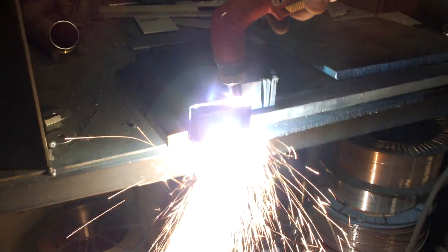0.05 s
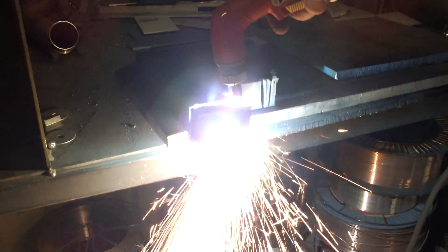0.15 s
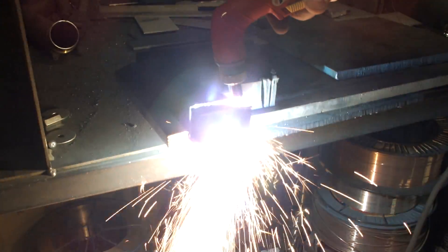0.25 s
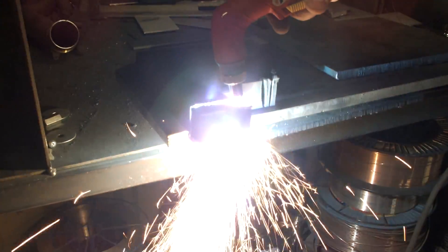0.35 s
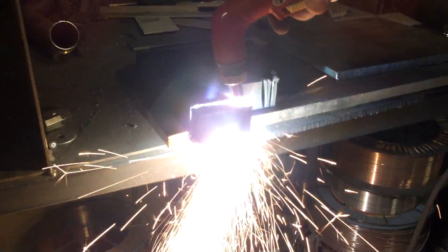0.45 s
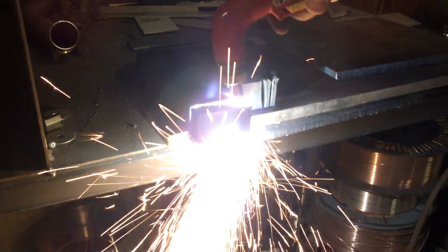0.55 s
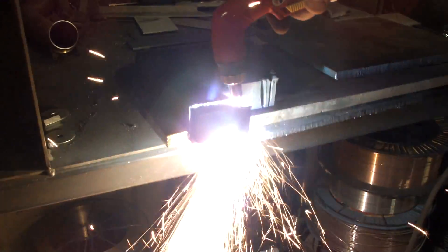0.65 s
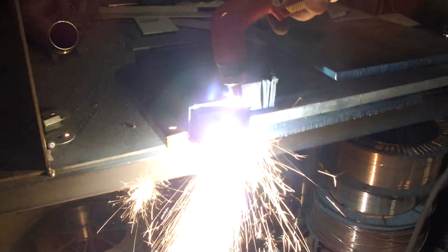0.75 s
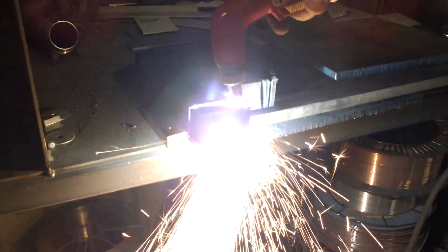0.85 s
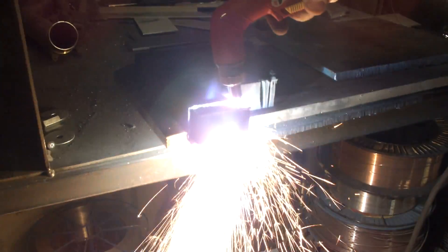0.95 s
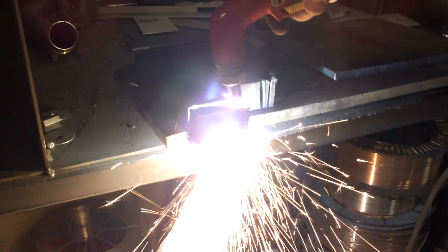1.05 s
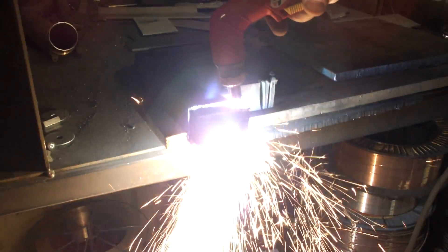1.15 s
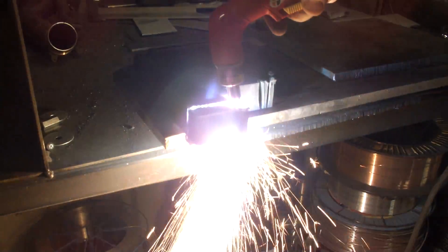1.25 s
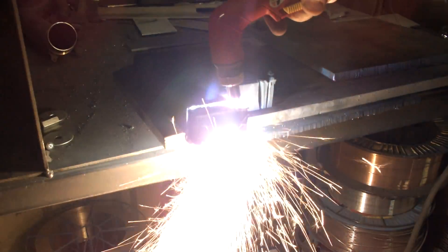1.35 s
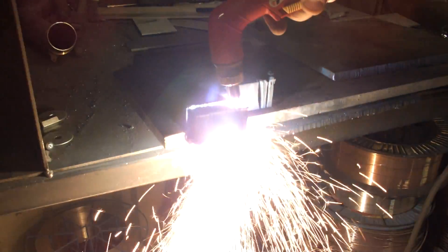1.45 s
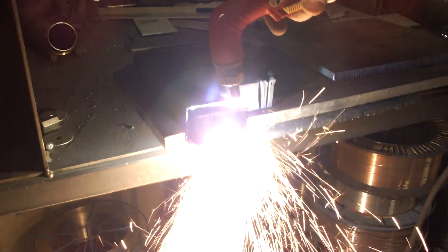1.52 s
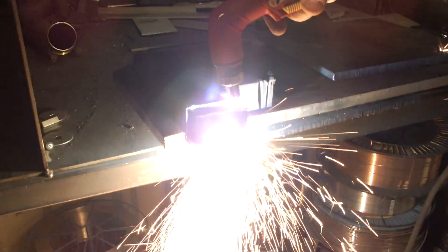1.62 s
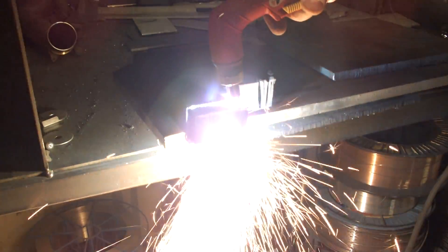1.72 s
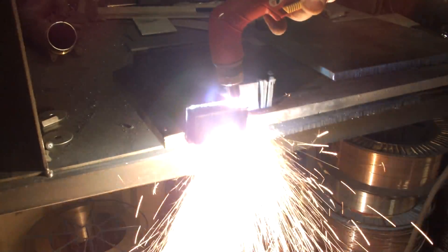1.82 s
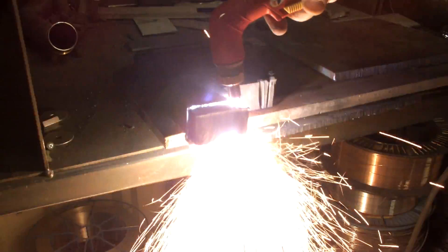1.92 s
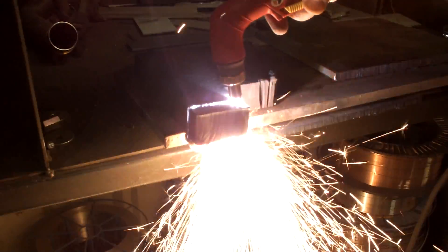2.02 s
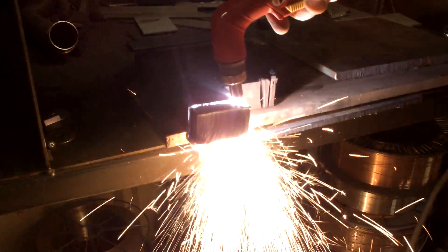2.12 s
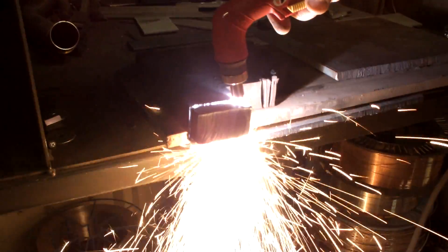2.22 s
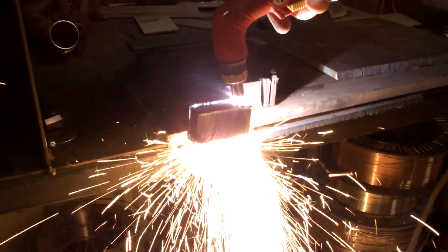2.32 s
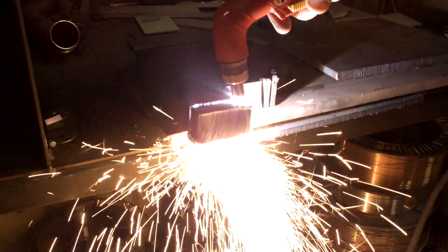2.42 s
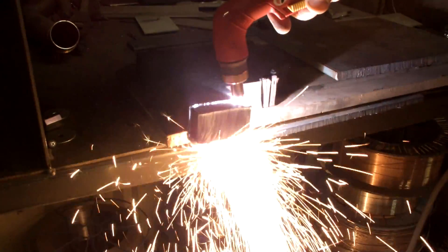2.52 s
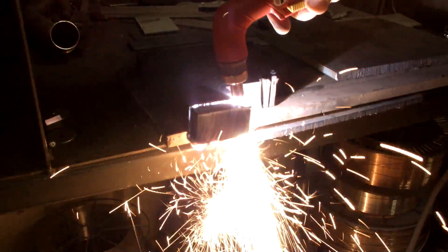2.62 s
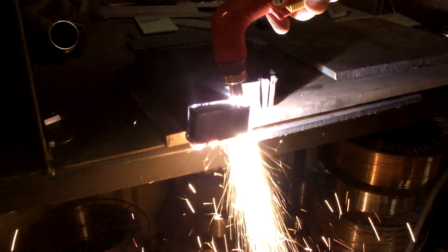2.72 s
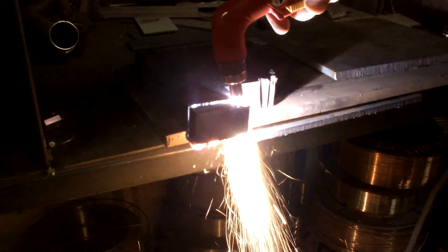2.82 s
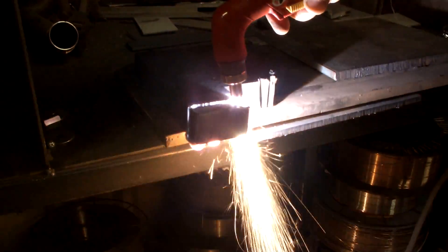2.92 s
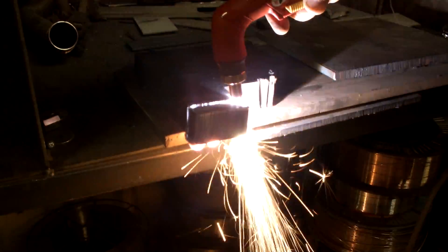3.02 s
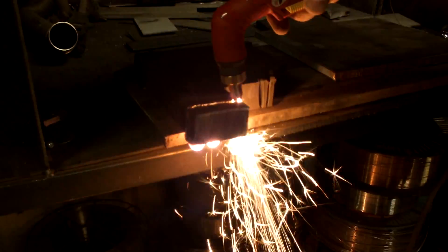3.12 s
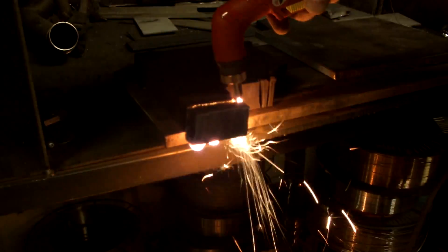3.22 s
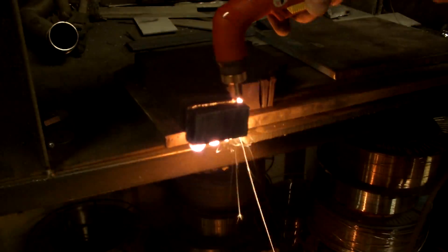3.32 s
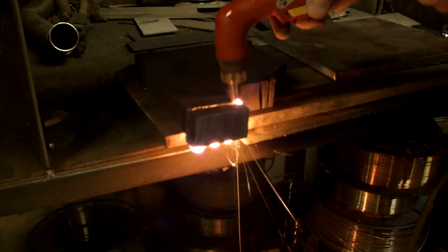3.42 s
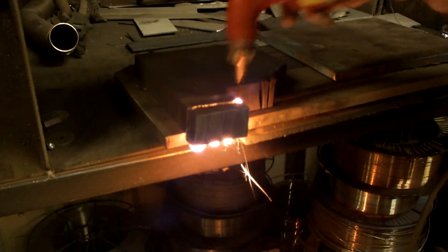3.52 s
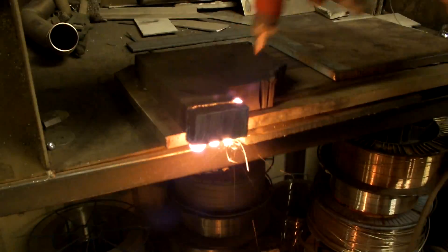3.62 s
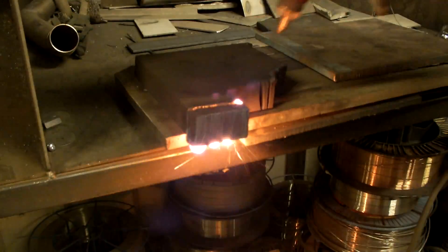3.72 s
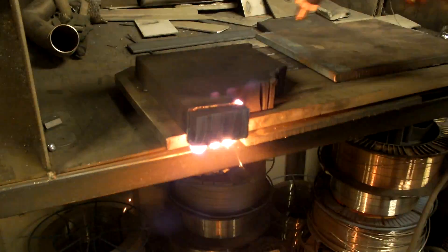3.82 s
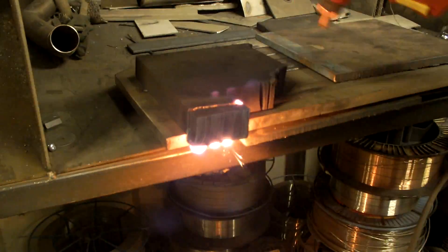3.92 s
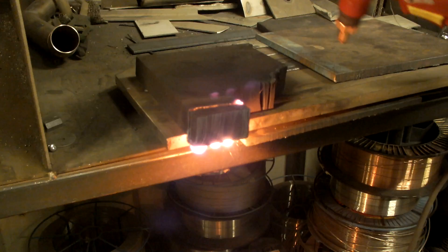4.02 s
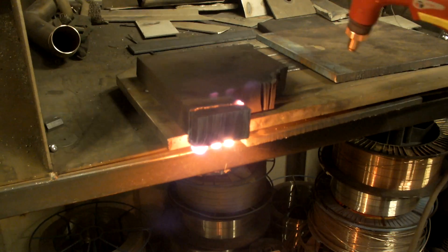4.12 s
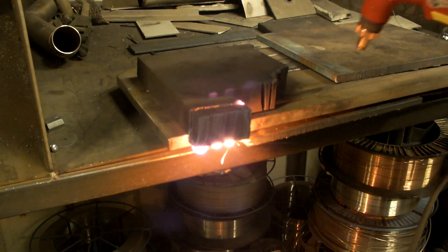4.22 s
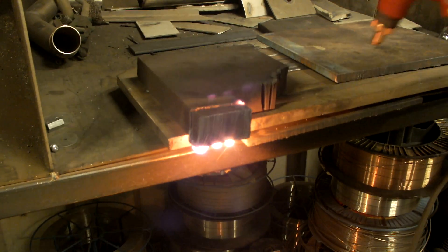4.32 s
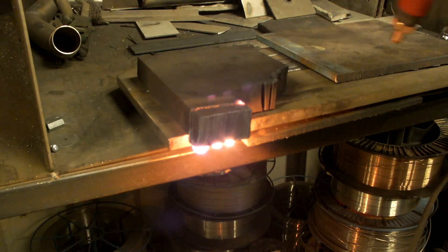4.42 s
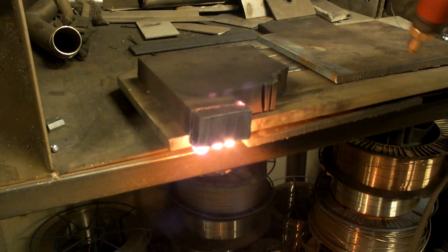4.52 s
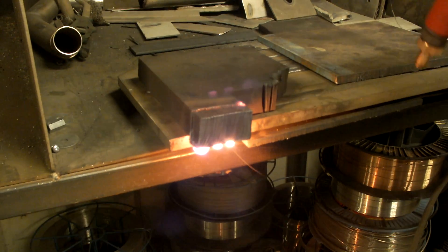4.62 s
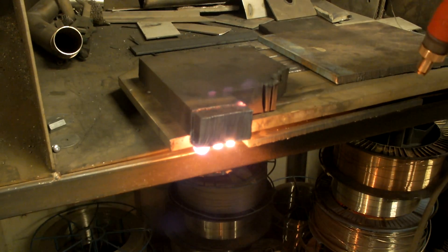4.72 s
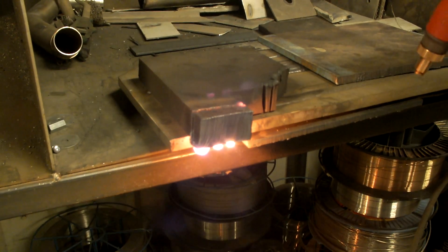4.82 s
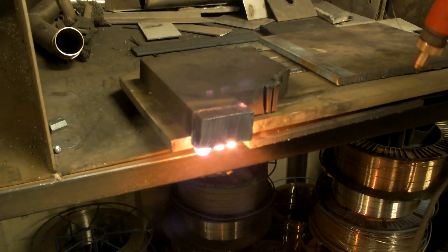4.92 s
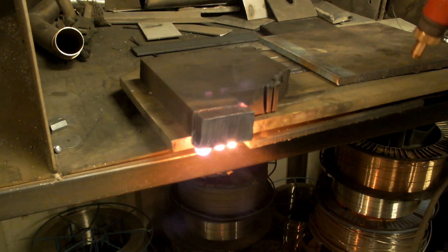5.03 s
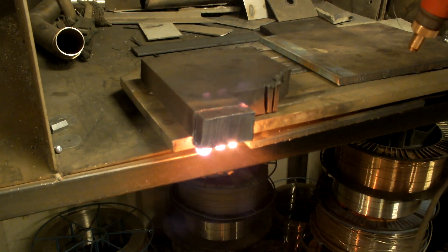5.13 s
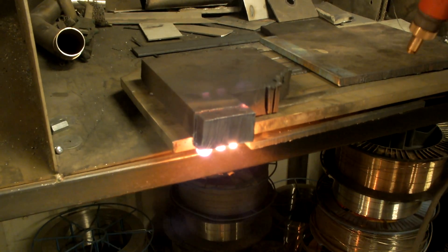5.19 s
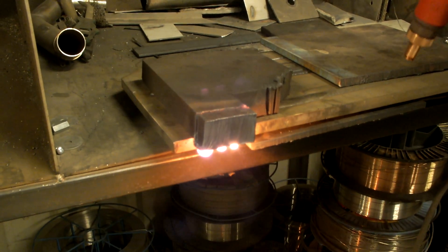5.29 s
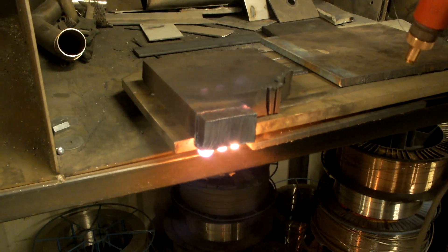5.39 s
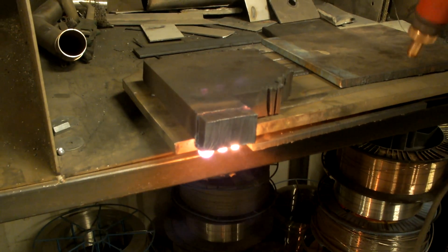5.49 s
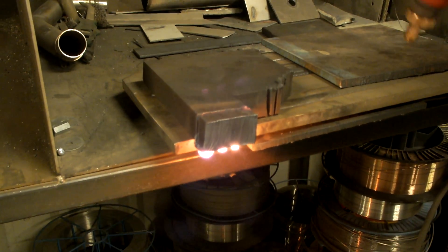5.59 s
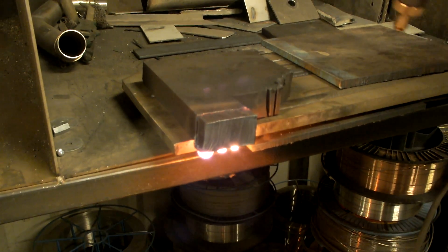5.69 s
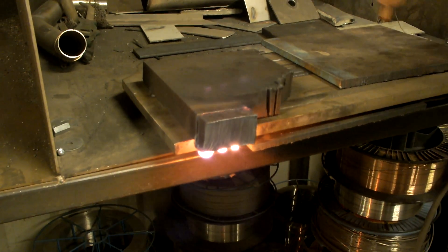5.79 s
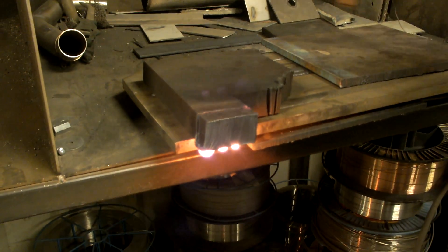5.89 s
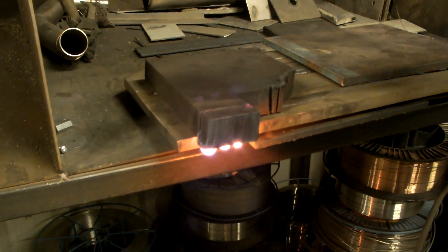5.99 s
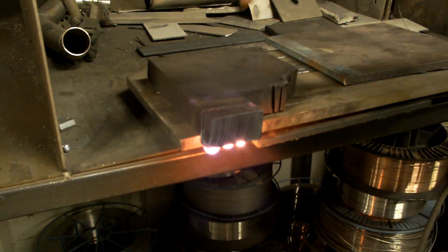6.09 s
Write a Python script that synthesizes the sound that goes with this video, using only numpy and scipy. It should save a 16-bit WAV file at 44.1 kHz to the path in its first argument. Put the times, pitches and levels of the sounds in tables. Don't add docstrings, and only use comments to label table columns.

```python
import sys
import numpy as np
from scipy import signal
from scipy.fft import rfft, irfft, next_fast_len
from scipy.io import wavfile
from scipy.ndimage import uniform_filter1d

SR = 44100
rng = np.random.default_rng(int(sys.argv[2]) if len(sys.argv) > 2 else 0)


def voltage_ratio(level):
    return 10 ** (np.asarray(level, float) / 20)


def unload_wav(signal):
    wavfile.write(
        sys.argv[1],
        SR,
        np.round(np.clip(np.atleast_2d(signal).T, -1, 1) * 32767).astype(np.int16),
    )


N = 271215
T = np.arange(N) / SR
SIZE = next_fast_len(int(3.3 * SR))
HZ = np.maximum(np.arange(SIZE // 2 + 1) * SR / SIZE, 1)

# low_hz, high_hz
JET_BANDS = [
    (40, 150),
    (150, 900),
    (1500, 3200),
    (3800, 7000),
    (7600, 8800),
    (9000, 15000),
]
# pitch_hz, level_db (per Hz)
BURIED_COLOUR = [(18, -60), (30, -33), (471, -14.5), (955, -14), (1940, -8.5), (2150, -8.5), (3640, -5),
                 (4150, -7), (5680, -3), (6050, -3.5), (6450, -5), (7390, -5), (8870, -6), (9600, -8),
                 (11500, -9), (14200, -12), (15800, -18)]
FREE_COLOUR = [(18, -59), (30, -26), (114, -23), (198, -9), (238, -15.5), (775, -11.5), (860, -9.5),
               (2150, -4), (2460, -3.5), (2800, -1.5), (3900, -0.5), (5990, 1), (7200, -4.5), (8420, -0.5),
               (9860, -10), (11500, -7.5), (14200, -12), (15800, -21)]
# pitch_hz, width_hz, boost_db
BURIED_RINGING = [(2218, 143, 2.4), (2433, 124, 1.9), (3295, 152, 2.0), (3682, 96, 1.6), (4393, 131, 2.7),
                  (4565, 61, 3.3), (4867, 76, 2.2), (5082, 102, 3.1), (5463, 86, 2.6), (5765, 90, 2.8),
                  (5986, 104, 3.0), (6761, 55, 1.8), (6977, 70, 2.8), (7838, 88, 2.6), (7967, 83, 3.4),
                  (8247, 63, 1.6), (9022, 60, 2.1), (9238, 73, 2.9), (9604, 51, 1.9), (9733, 180, 1.9),
                  (10379, 158, 2.2), (10530, 136, 1.9), (11434, 90, 2.3), (12468, 110, 1.9)]
FREE_RINGING = [(1507, 135, 1.6), (1744, 64, 3.1), (2261, 117, 3.3), (2445, 150, 5.6), (2993, 78, .6),
                (3316, 113, 2.8), (3510, 53, 1.5), (4264, 210, 1.6), (4673, 151, 1.5), (5082, 95, 3.5),
                (5771, 97, 2.0), (6202, 103, 3.6), (6848, 115, 3.3), (7214, 106, 2.3), (7817, 77, 2.8),
                (7989, 136, 1.9), (8204, 71, 3.5), (9022, 60, 1.7), (9216, 92, 2.1), (10121, 198, 2.2),
                (10702, 86, 2.1), (11003, 87, 2.2), (12618, 87, 2.3), (12855, 136, 2.8)]
# pitch_hz, width_hz, boost_db
OFFCUT_GAP = [(2160, 420, 2.5)]
# pitch_hz, level_db
BURIED_SIDE = [(60, -2), (110, -2), (200, -1), (380, -2), (700, -2), (1290, -3), (2380, -7.5), (4400, -6.5),
               (8120, -4.5), (15000, -4.5)]
BURIED_LEFT = [(60, 6), (110, 2.5), (200, 6.5), (380, 6), (700, 5.5), (1290, 7), (2380, -2.5), (4400, -1),
               (8120, 2.5), (15000, 2.5)]
# pitch_hz, level_db
FREE_SIDE = [(60, -2), (110, -3), (200, -10), (380, -3), (700, -5), (1290, -8), (2380, -8.5), (4400, -4.5),
             (8120, -4.5), (15000, -2)]
FREE_LEFT = [(60, -0.5), (110, -1), (200, 2.5), (380, 0.5), (700, 3), (1290, 4), (2380, 0), (4400, 0.5),
             (8120, 2.5), (15000, -2)]
# time_s, level_db
JET_PUSH = [
    (0, 1),
    (.5, 0.5),
    (1.3, 0.36),
    (1.47, 0),
    (1.85, 0),
    (2.18, -4.5),
    (2.48, -4.5),
    (2.72, -1),
    (3.06, -1.5),
]
# level_db inside the cut, change_db past the edge, push_share (ratio)
JET_LEVELS = [
    (-57, 2.5, 2),
    (-42.5, 2.5, 1.38),
    (-30.5, 3, -0.081),
    (-22, -0.3, 1.12),
    (-27, 3, 1.26),
    (-21, -0.8, 0.37),
]
# time_s, length_s, level_db (of the rumble)
SLAG = [(.1, 0.12, 1), (.39, 0.054, 4.5), (.6, 0.034, 3.5), (.8, 0.11, 3.5), (1.12, 0.059, -2),
        (1.26, 0.071, 5.5), (1.57, 0.045, -3), (1.72, 0.062, 1.5), (2.02, 0.044, 3), (2.27, 0.036, 3),
        (2.62, .08, 3), (2.9, 0.049, 0.5), (3.05, .04, 4)]
SLAG_SHARES = [0.6, 1.13, 0.3, 0.046, 0.01, 0.2]
# time_s, length_s, level_db
LEAN = [
    (1.3, 0.15, -0.5),
    (2.0, .06, 1),
    (2.25, .12, 1.5),
    (2.7, .08, 1),
    (2.9, .05, -0.5),
    (3.04, .04, 2.5),
]
LEAN_SHARES = [.2, 0.024, -0.39, 0.82, 0.13, -0.27]
ARC_OFF_S = 3.064
RIPPLE_HZ = 99.9


def arc():
    breakout_s, breakout_length_s = 2.08, 0.092
    out = np.clip((T - breakout_s) / breakout_length_s + .5, 0, 1)
    push, slag, lean = curve(JET_PUSH), bumps(SLAG), bumps(LEAN)
    levels = [db + edge_db * out + share * push + spit * slag + turn * lean
              for (db, edge_db, share), spit, turn in zip(JET_LEVELS, SLAG_SHARES, LEAN_SHARES)]
    ripple = 1 + .012 * np.sin(2 * np.pi * RIPPLE_HZ * T)
    buried = voltage_ratio(on_log(BURIED_COLOUR, HZ)) * resonances(BURIED_RINGING, 1.25)
    free = voltage_ratio(on_log(FREE_COLOUR, HZ)) * resonances(FREE_RINGING, 1.35) * resonances(OFFCUT_GAP, 1)
    inside = turbulence(buried, JET_BANDS, levels, BURIED_SIDE, BURIED_LEFT, 0.36, 0.87, ripple)
    outside = turbulence(free, JET_BANDS, levels, FREE_SIDE, FREE_LEFT, 0.43, 0.69, ripple, start=1.49)
    jet = np.sqrt(1 - out) * inside + np.sqrt(out) * outside

    arc_t60, shop_t60, shop_db = 0.073, 0.52, -15.5
    after = np.maximum(T - ARC_OFF_S, 0)
    dying = voltage_ratio(-60 * after / arc_t60)
    shop_tail = voltage_ratio(shop_db - 60 * after / shop_t60)
    return jet * np.maximum(dying, shop_tail)


# time_s, level_db
WHINE = [(0, -28.5), (.3, -26), (.89, -28), (.99, -31), (1.2, -31.5), (1.31, -29), (1.38, -24.5),
         (1.75, -25.5), (2.09, -28.5), (2.2, -30.5), (2.27, -35), (2.36, -31), (2.47, -38), (2.55, -45)]


def whine():
    pitch_hz, ripple_rad, ripple_depth = 8633.5, .4, .26
    s, db = np.transpose(WHINE)
    ripple = np.sin(2 * np.pi * RIPPLE_HZ * T)
    phase = 2 * np.pi * pitch_hz * T + .15 * walk(20) + ripple_rad * ripple
    tone = np.sqrt(2) * np.sin(phase) * (1 + ripple_depth * ripple)
    level = voltage_ratio(np.interp(T, s, db) + 1.1 * walk(25))
    fade = np.clip((s[-1] + .1 - T) / .1, 0, 1)
    return tone * level * fade * voltage_ratio([[1.2], [-1.2]])


# pitch_hz, level_db (per Hz)
AIR_COLOUR = [(18, -44), (30, -28), (103, -11.5), (165, -17), (210, -4), (270, -11.5), (420, -13),
              (750, -13), (1800, -10.5), (2150, -10.5), (2950, -6.5), (13200, -12.5), (15800, -13)]
# pitch_hz, width_hz, boost_db
NOZZLE = [(2170, 140, 7), (2200, 60, 5), (2430, 59, 11), (2530, 56, 3), (3100, 79, 2.5), (3340, 91, 1),
          (3639, 86, 1), (4730, 98, 4), (5080, 200, 4), (5870, 98, 3)]
# pitch_hz, level_db
AIR_SIDE = [(60, -9), (110, -13), (200, -18), (380, -14), (700, -14), (1290, -8.5), (2380, -6),
            (4400, -2.5), (8120, -1), (15000, 4.5)]
AIR_LEFT = [(60, 0), (110, 2), (200, 2), (380, 2.0), (700, 4), (1290, 3), (2380, -1.5), (4400, -2),
            (8120, 2.5), (15000, 1)]
# level_db in the open, cut_extra_db, rim_extra_db, rim_s, clearing_s
AIR_LEVELS = [
    (-54, 5.5, 4.5, 3.42, .08),
    (-49.5, 8, 12.5, 3.416, 0.15),
    (-46, 4, 8, 3.53, 0.045),
    (-46.5, -3, 7, 3.5, 0.066),
    (-44.5, -3.5, 4, 3.48, 0.068),
    (-45, -11, 0, 3.9, .04),
]
# time_s, level_db
AIR_AIM = [
    (3.7, 0.5),
    (3.9, 0.5),
    (3.95, -0.5),
    (4.25, -0.5),
    (4.7, -1.9),
    (5.05, 0),
    (5.3, -0.5),
    (5.8, -0.5),
    (6.12, 0.5),
]
# time_s, length_s, level_db
SIZZLE = [
    (3.47, .045, 3.5),
    (3.64, .09, -2),
    (5.33, .11, 1),
]
# time_s, length_s, level_db
STEPS = [
    (3.25, .2, -1.2),
    (3.58, .04, 7),
    (5.2, 0.27, 5.5),
    (5.52, 0.12, 10.5),
    (6.0, 0.13, 4),
]


def air():
    swing_s, swing_db, swing_back_s = 3.555, -5, 0.11
    swing = swing_db * (T > swing_s) * np.exp(-np.maximum(T - swing_s, 0) / swing_back_s)
    aim = curve(AIR_AIM)
    hiss = []
    for db, cut_db, rim_db, rim_s, clearing_s in AIR_LEVELS:
        lift = np.interp(T, [ARC_OFF_S, rim_s, rim_s + clearing_s], [cut_db, rim_db, 0])
        hiss.append(db + lift + swing + aim)
    hiss[-1] = hiss[-1] + bumps(SIZZLE)
    floor_rumble = -71.5 + bumps(STEPS)
    fan_draught = -57.5 + bumps(FAN_SHADE)
    bands = [(40, 160), (170, 350), (600, 1800), (2000, 3200),
             (4200, 7000), (7500, 9000), (10000, 13000), (13500, 15500)]
    gain = voltage_ratio(on_log(AIR_COLOUR, HZ)) * resonances(NOZZLE, .6)
    levels = [floor_rumble, fan_draught, *hiss]
    return turbulence(gain, bands, levels, AIR_SIDE, AIR_LEFT, 0.35, 0.78, start=2.86)


# time_s, pitch_hz, level_db
RIM_TONE = [
    (3.25, 12000, -58),
    (3.36, 12200, -48),
    (3.43, 12500, -44),
    (3.465, 13800, -43),
    (3.5, 14600, -43),
    (3.53, 14800, -60),
]


def rim_tone():
    width_hz = 1900
    s, hz, db = np.transpose(RIM_TONE)
    k = int(SR / width_hz)
    slow = uniform_filter1d(uniform_filter1d(rng.standard_normal((4, N)), k), k)
    turn = 2 * np.pi * np.cumsum(np.interp(T, s, hz)) / SR
    band = (slow[:2] * np.cos(turn) + slow[2:] * np.sin(turn)) / slow.std()
    return np.sqrt(2) * band * voltage_ratio(np.interp(T, s, db, -120, -120))


# pitch_hz, level_db, t60_s
THUD = (3.381, -33.5, .012, [(217, -5, 0.25), (257, 1, .12), (303, -5, .2), (370, -7, .1), (170, -16, .1),
        (754, -15, .25), (818, -15, .25)])
CLINK = (3.537, -23, 0.002, [(190, -11.5, 0.27), (693, -14, .25), (837, 1, 0.14), (907, 1.5, 0.13),
         (1060, -10, 0.15), (1180, -12, .2), (1330, -6, .3), (1508, 1.5, .45), (1565, -6, .35),
         (1630, -12, .2), (1990, -15, .2)])
KNOCK = (4.824, -26, 0.0096, [(309, -8, .16), (390, -12, 0.59), (454, -14, .35), (568, -8, .15),
         (694, -1, .15), (790, -3, 0.27), (940, -7, .15), (1087, -8, .2), (1244, -6, .14), (1733, -14, .2),
         (2220, -12, .2), (2859, -3, .08)])
CLACK = (5.336, -23.5, .003, [(682, -9, .15), (1090, -4, .1), (1230, -11, .13), (1890, -1, .15),
         (2000, -2, .15), (2500, -8, .15), (2900, -4, .15), (3074, -10, .3), (3268, -5, .17)])


def blows():
    return sum(blow(*b) for b in (THUD, CLINK, KNOCK, CLACK))


def blow(start, peak_db, contact, modes):
    t = np.arange(int(.6 * SR)) / SR
    push = 1 - np.exp(-t / max(contact, .001))
    hit = np.zeros((2, len(t)))
    for hz, db, t60 in modes:
        level = voltage_ratio(db - 60 * t / np.clip(t60, .03, .6) + 1.9 * walk(57, size=len(t)))
        ring = level * np.sin(2 * np.pi * (hz * t + 0.24 * rng.random()))
        hit += push * ring * voltage_ratio(np.array([[1], [-1]]) * (1.5 + rng.standard_normal()))
    out = np.zeros((2, N))
    out[:, int(start * SR):][:, :len(t)] = hit * voltage_ratio(peak_db) / abs(hit.mean(axis=0)).max()
    return out


# pitch_hz, width_hz, boost_db
BENCH = [(419, 39, 6), (600, 140, 2), (665, 19, 7), (1020, 220, 4), (1300, 61, 1.5), (1470, 68, 1),
         (1810, 36, 2), (2040, 170, 2.5), (2230, 66, 3.5), (2480, 91, 4), (2910, 63, 5), (3330, 77, 1.5)]
# start_s, level_db, pitch_octaves (above 1 kHz), t60_s
RATTLES = [(3.385, -39.5, -.6, .4), (3.538, -34, 0.54, 0.86), (3.56, -47, -1.4, .6), (3.72, -44, .8, .3),
           (3.86, -45, .8, .5), (3.895, -40, 0.53, 0.19), (4.823, -34, -0.1, 0.33),
           (4.83, -38.5, -1.5, 0.9), (4.823, -34.5, 1.5, 0.24), (5.224, -39, -0.094, .4),
           (5.3, -31, 1.3, .4), (5.325, -29, 1.2, 0.46), (5.362, -34, 1.1, .22), (5.415, -32.5, 1.1, 0.38),
           (5.445, -34, 1.4, .3), (5.472, -34, -1.16, 0.44), (5.503, -41, -0.98, 0.54)]
# start_s, length_s, level_db, pitch_octaves (above 1 kHz)
DRAGS = [
    (3.62, 0.15, -49, 0.6),
    (4.12, .42, -44.5, 0),
    (5.12, 0.16, -45.5, -1.3),
    (5.5, .12, -49, -1.2),
    (5.223, 0.29, -38, -0.9),
    (5.3, 0.18, -38, 1),
    (5.82, .2, -58, -1.4),
    (6.004, .2, -53, 0.29),
    (6.12, .1, -45, -.9),
]


def scrape():
    jolt_s, drag_ease_s = .01, .085
    bands = [(300, 700), (700, 1400), (1400, 2100), (2100, 3800)]
    octaves = np.log2(np.sqrt(np.prod(bands, axis=1, keepdims=True)) / 1000)
    band_share_db = np.array([[0], [0], [-2.5], [-1.5]])

    def colour(db, pitch):
        return voltage_ratio(db + band_share_db - np.maximum(8 * (octaves - pitch), 9 * (pitch - octaves)))

    power = 1e-10
    for s, db, pitch, t60 in RATTLES:
        jolt = np.clip((T - s) / jolt_s, 0, 1)
        power = power + (colour(db, pitch) * jolt * voltage_ratio(-60 * np.maximum(T - s, 0) / t60)) ** 2
    for s, length, db, pitch in DRAGS:
        ease = np.clip(np.minimum(T - s, s + length - T) / drag_ease_s + .5, 0, 1) ** 2
        power = power + (colour(db, pitch) * ease) ** 2
    levels = 10 * np.log10(power)
    grip = voltage_ratio(1.4 * walk(300))
    grip = grip / np.sqrt(np.mean(grip ** 2))
    gain = resonances(BENCH, 1.45) / np.sqrt(1 + (230 / HZ) ** 8) / np.sqrt(1 + (HZ / 3750) ** 24)
    return turbulence(gain, bands, levels, AIR_SIDE, AIR_LEFT, .3, .6, grip,
                      lowest=7.5, start=2.86, highest=12)


# pitch_hz, level_db
FAN = [
    (210, -61.5),
    (420, -67),
    (630, -76),
    (840, -65),
]
# time_s, length_s, level_db
FAN_SHADE = [
    (3.19, 0.12, -6),
    (3.75, 0.09, 3),
    (4.1, .15, 2),
    (4.85, .08, 2.5),
    (5.35, 0.043, -1),
]


def fan():
    turn = 2 * np.pi * np.cumsum(1 + 0.01206 * walk(12)) / SR
    shade = bumps(FAN_SHADE)
    tones = sum(np.sqrt(2) * voltage_ratio(db + shade + 2.9 * walk(22.03)) * np.sin(hz * turn) for hz, db in FAN)
    return tones * voltage_ratio([[1.5], [-1.5]])


def turbulence(gain, zones, levels, side, left, swell_db, flicker_db, excite=1, lowest=5, start=0, highest=14):
    span = np.arange(N)[int(start * SR):][:SIZE]
    source, diffuse = (rfft((excite * rng.standard_normal(N))[span], SIZE) * gain for _ in range(2))
    mid = source * (1 + .22 * echoes(.02)) / np.hypot(1, .22)
    share = .45 * np.clip(np.log2(HZ / 1500), 0, 1)
    paths = np.sqrt(2 * share) * mid * 1j * echoes(0.0021).imag
    edge = (paths + np.sqrt(1 - share) * diffuse) * voltage_ratio(on_log(side, HZ))
    pair = np.array([mid + edge, mid - edge]) * voltage_ratio(np.outer([.5, -.5], on_log(left, HZ)))

    lift = np.array(levels)[:, span] - np.array([[band_db(gain, z)] for z in zones])
    centres = np.log2([np.sqrt(lo * hi) for lo, hi in zones])
    out, swell, pitch = np.zeros((2, N)), walk(4.73, size=len(span)), np.log2(HZ)
    for octave in np.arange(lowest, highest + .1, .5):
        window = np.clip(1 - 2 * abs(pitch - octave), 0, 1)
        weights = [np.interp(octave, centres, row) for row in np.eye(len(zones))]
        db = weights @ lift + swell_db * swell + flicker_db * walk(8.97, size=len(span))
        band = irfft((pair * window).astype(np.complex64), SIZE)[:, :len(span)]
        out[:, span[0]:span[-1] + 1] += band * voltage_ratio(db)
    return out


def echoes(spread_s):
    t = np.arange(int(.1 * SR)) / SR
    response = rfft(rng.standard_normal(len(t)) * np.exp(-t / spread_s), SIZE)
    return response / np.sqrt(np.mean(abs(response) ** 2))


def resonances(peaks, share):
    return voltage_ratio(share * sum(db / (1 + (2 * (HZ - f) / w) ** 2) for f, w, db in peaks))


def band_db(gain, zone):
    inside = (HZ > zone[0]) & (HZ < zone[1])
    return 10 * np.log10(np.sum(gain[inside] ** 2) / len(HZ))


def walk(rate, size=N):
    k = int(SR / rate)
    held = np.repeat(rng.standard_normal(size // k + 1), k)
    return 1.35 * uniform_filter1d(uniform_filter1d(held, k), k)[:size]


def bumps(rows):
    return sum(db * np.exp(-.5 * ((T - s) / length) ** 2) for s, length, db in rows)


def curve(rows):
    return np.interp(T, *np.transpose(rows))


def on_log(table, hz):
    points_hz, values = np.transpose(table)
    return np.interp(np.log(hz), np.log(points_hz), values)


def scene():
    return arc() + whine() + air() + rim_tone() + blows() + scrape() + fan()


def band_limit(x):
    return signal.sosfilt(signal.butter(12, 16710, fs=SR, output="sos"), x)


def record(dry):
    top_hz = 15720
    size = next_fast_len(N)
    hz = np.arange(size // 2 + 1) * SR / size
    mix = irfft(rfft(dry, size) * np.clip((top_hz - hz) / 40, 0, 1), size)[:, :N]
    return band_limit(mix)


dry = scene()
out = record(dry)
unload_wav(out)
```